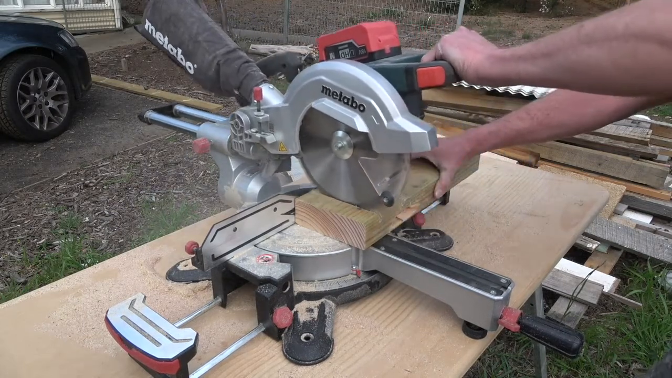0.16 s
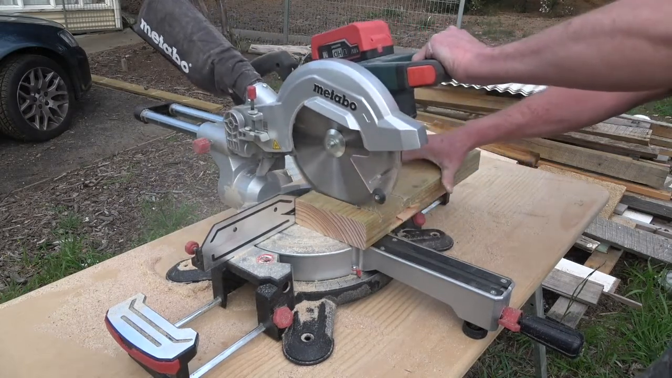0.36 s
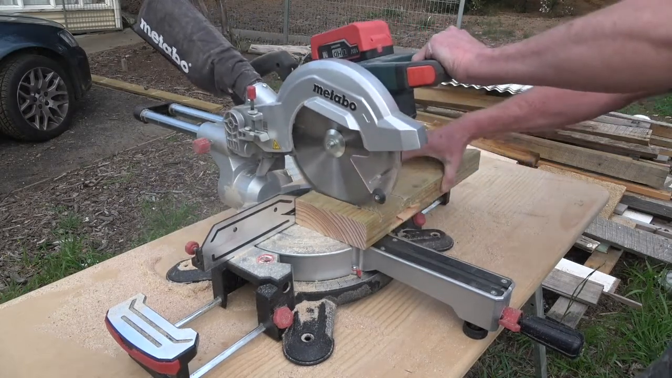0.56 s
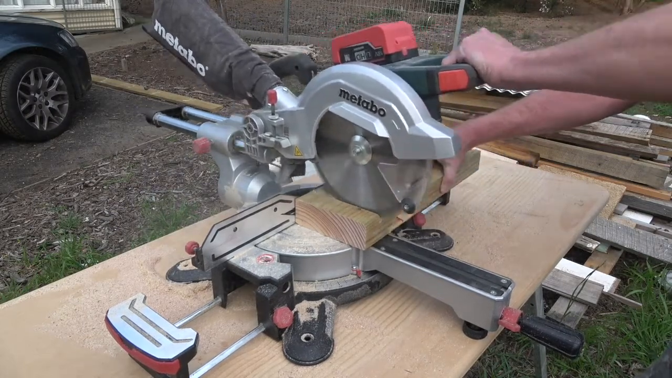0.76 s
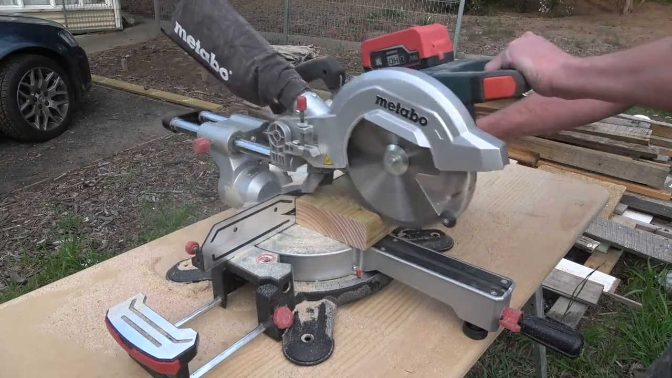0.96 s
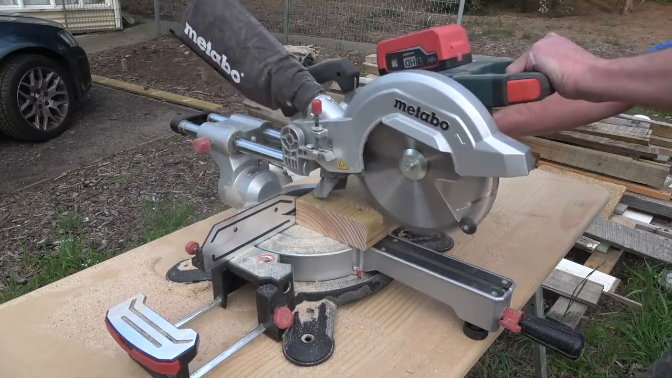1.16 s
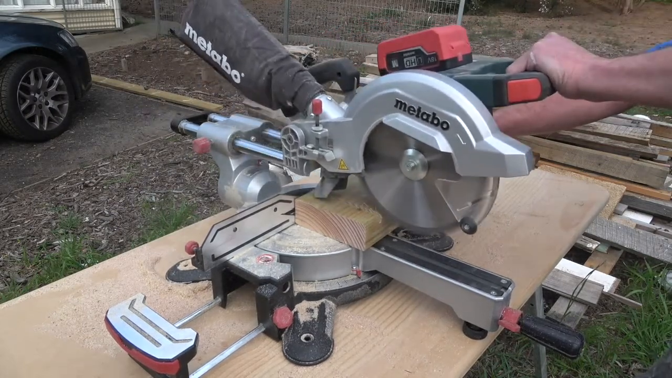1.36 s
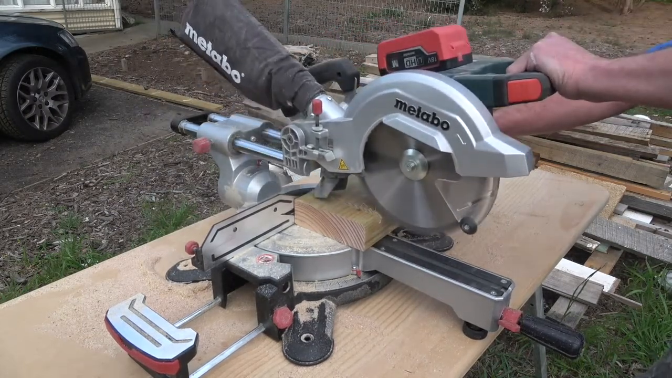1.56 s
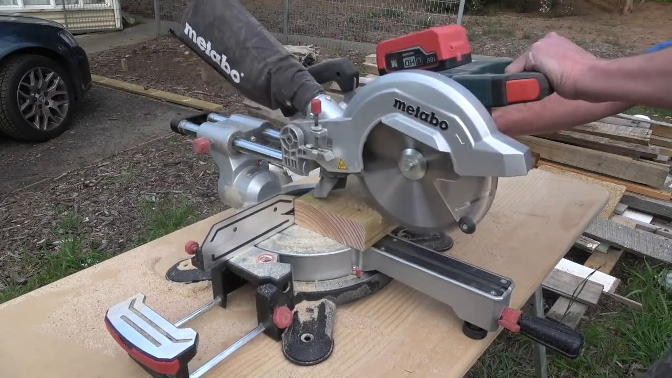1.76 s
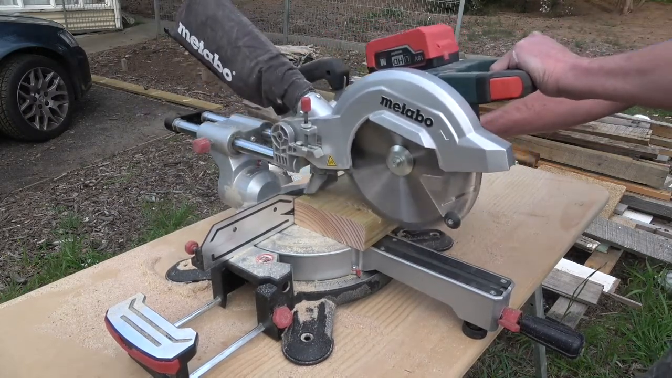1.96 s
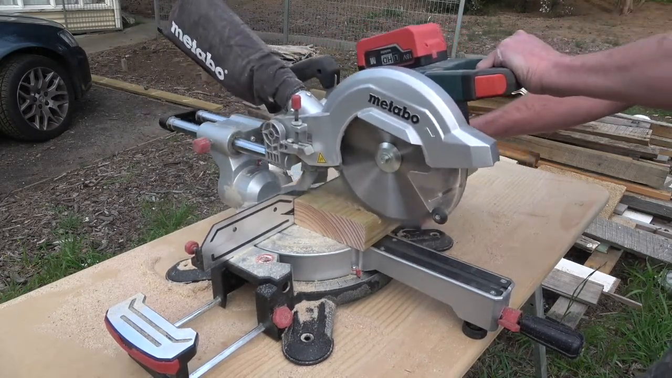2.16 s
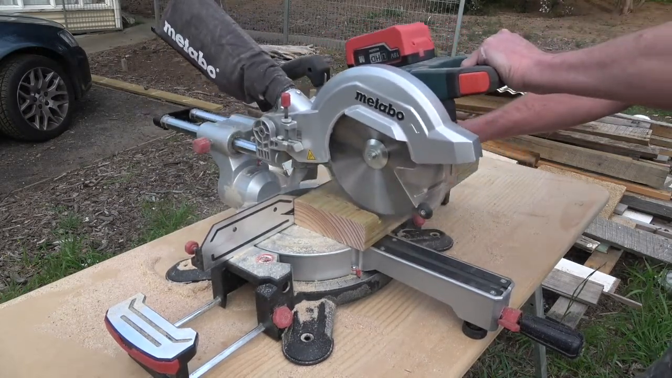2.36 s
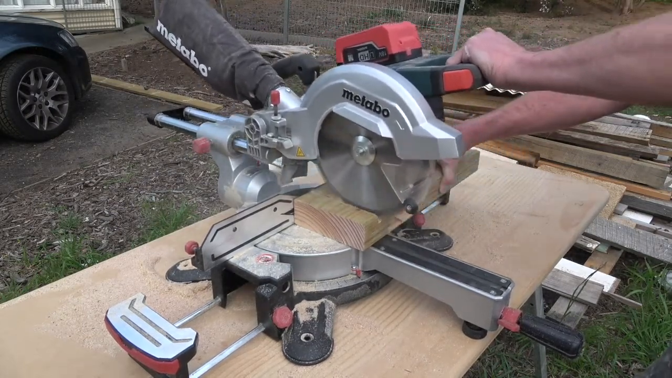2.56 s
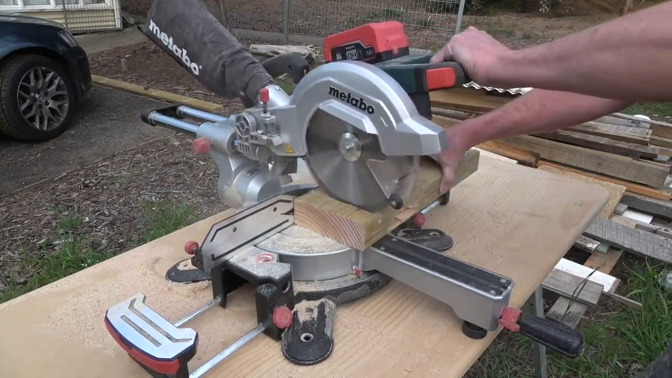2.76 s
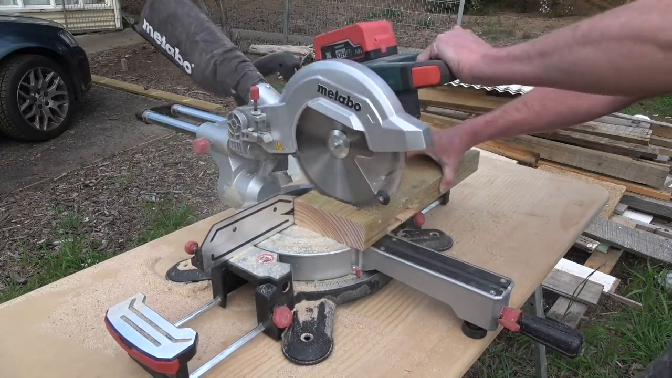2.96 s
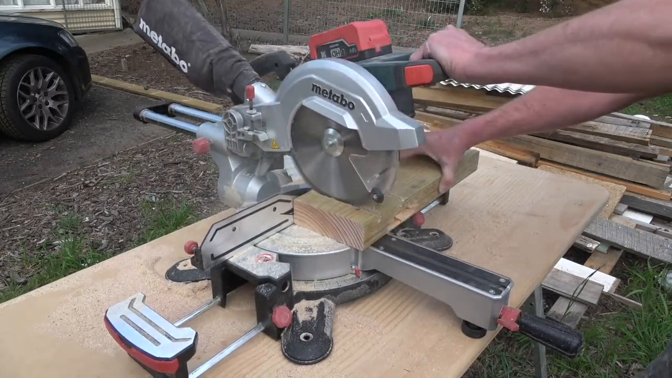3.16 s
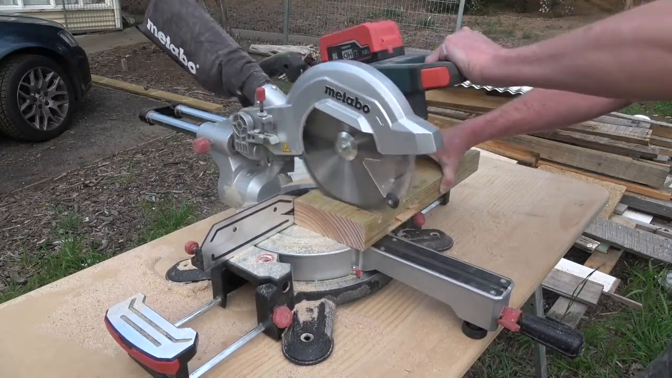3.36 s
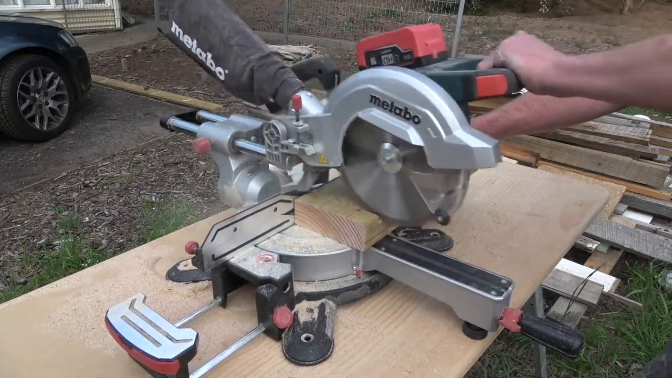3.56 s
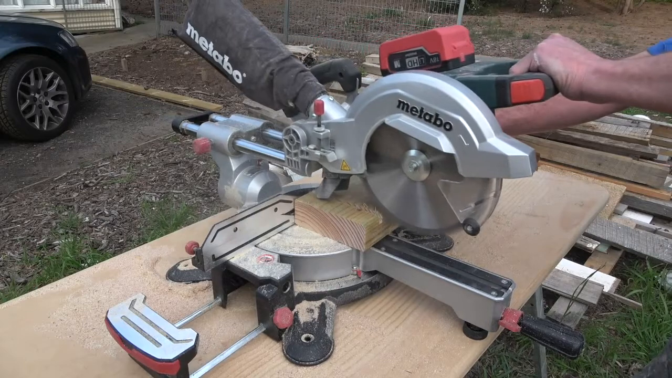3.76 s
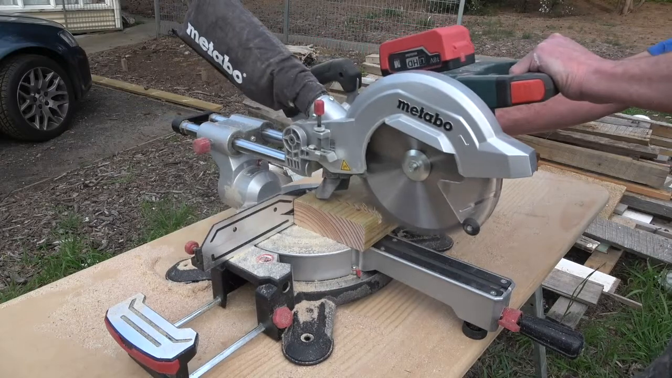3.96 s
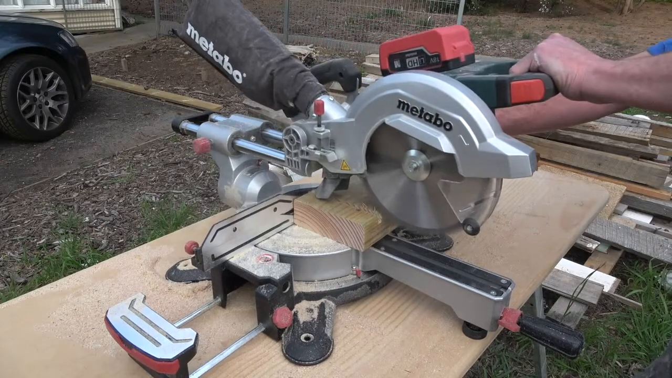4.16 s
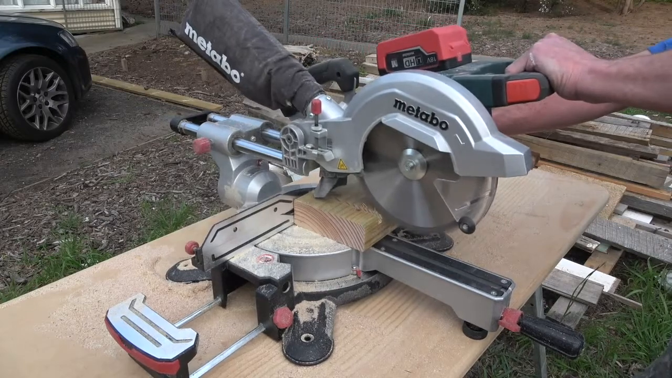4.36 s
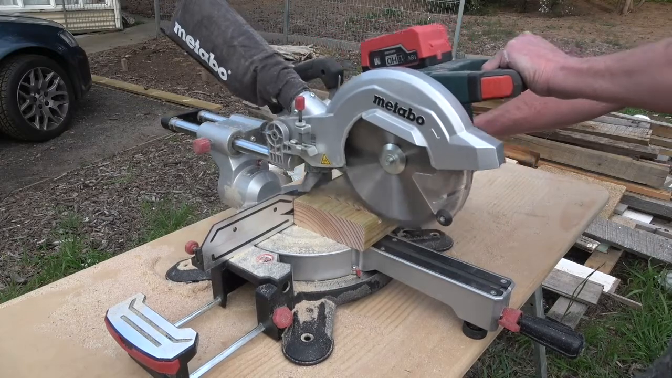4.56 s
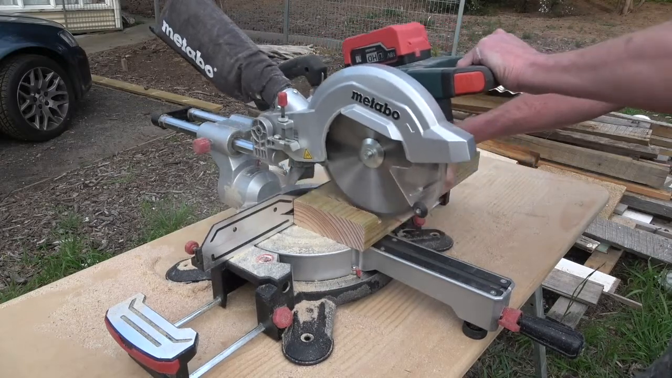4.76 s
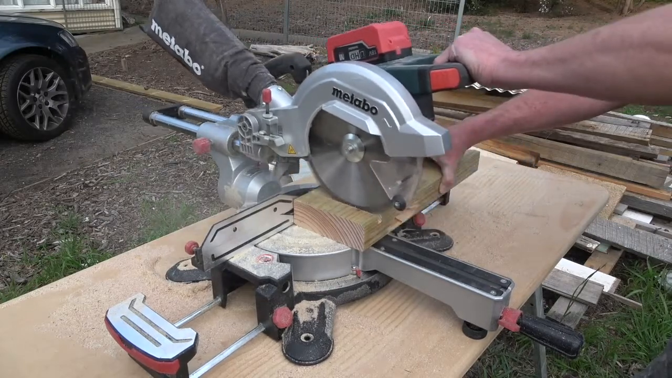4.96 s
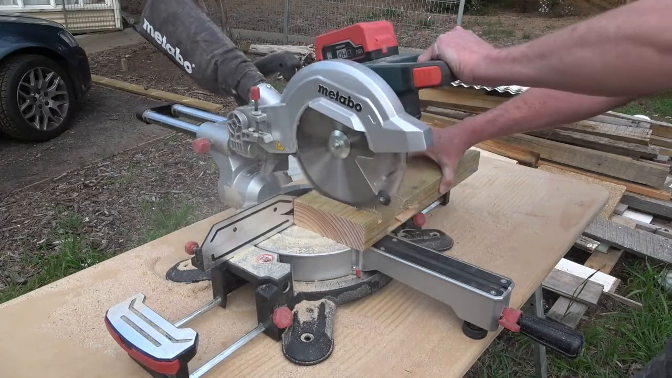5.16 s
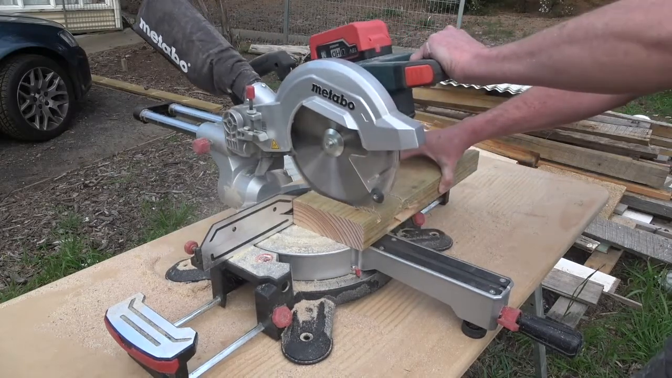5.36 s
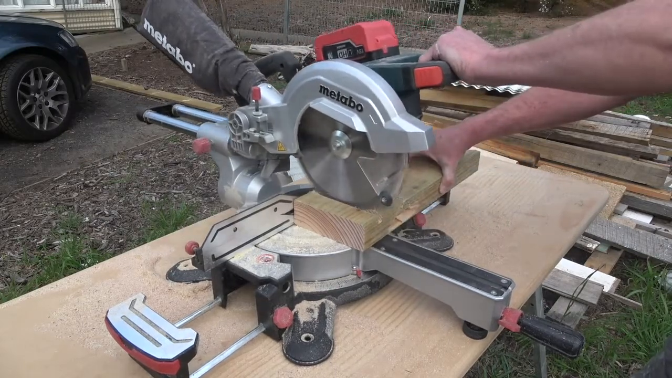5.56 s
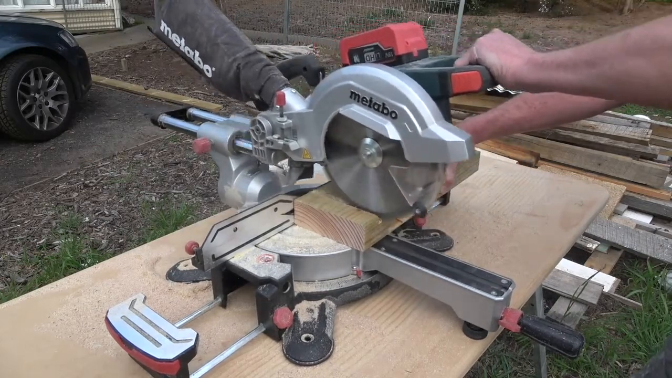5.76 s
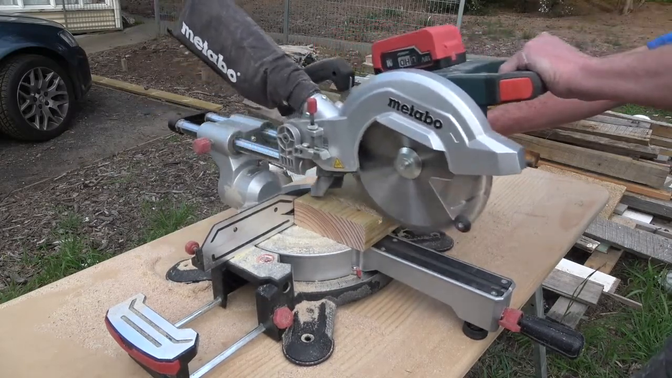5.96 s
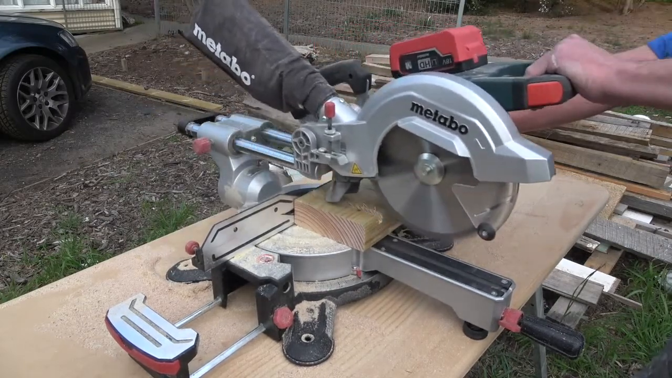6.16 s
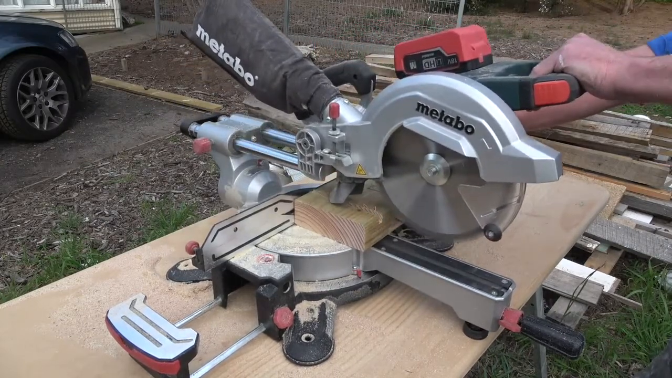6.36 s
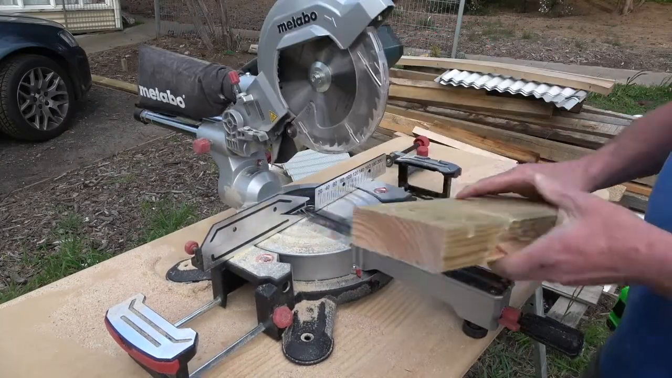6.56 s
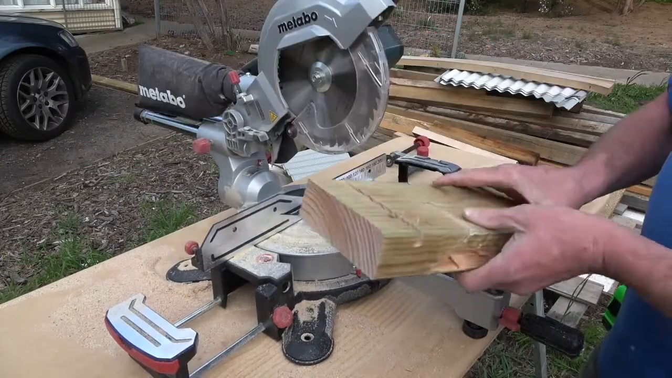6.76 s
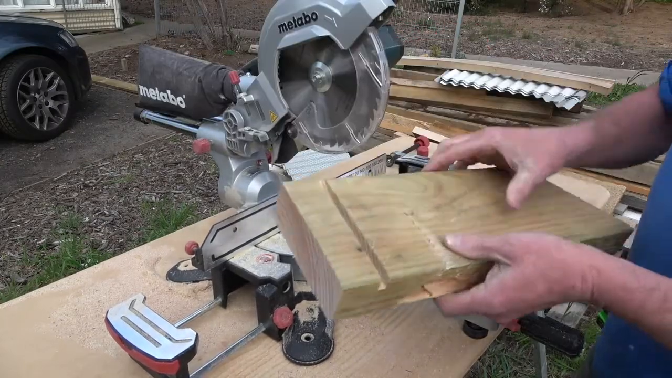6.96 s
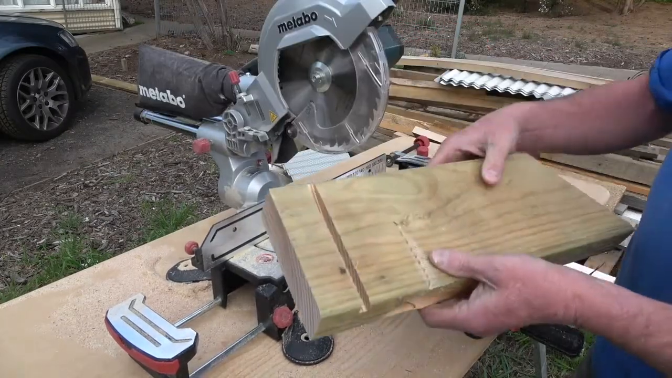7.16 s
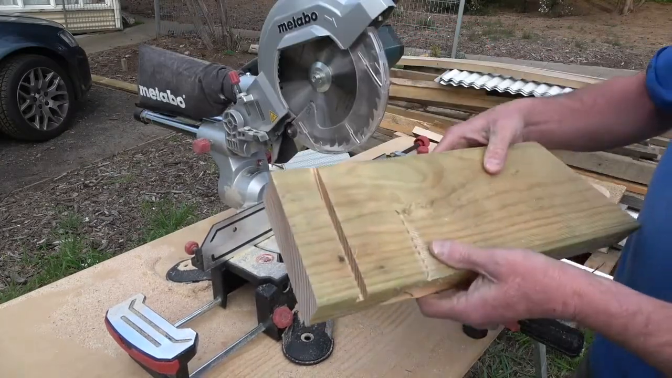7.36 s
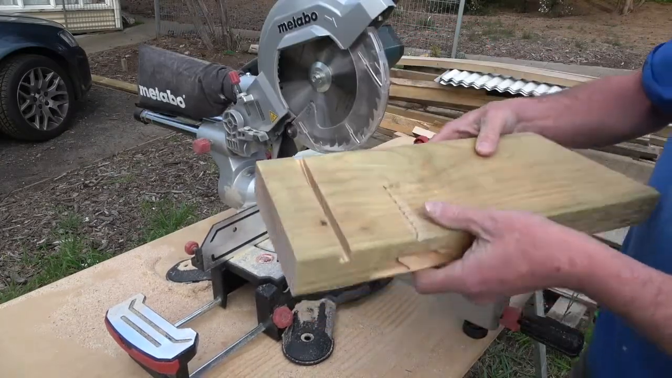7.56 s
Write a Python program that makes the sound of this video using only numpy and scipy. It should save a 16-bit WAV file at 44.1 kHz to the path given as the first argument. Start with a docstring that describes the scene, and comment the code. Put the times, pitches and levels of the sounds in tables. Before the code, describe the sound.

A power saw cuts wood three times, its pitch dipping and recovering, then slows and stops abruptly as wind bumps the microphone.

```python
"""Outdoors: a cordless mitre saw makes three passes through a plank, then brakes.
The motor sags under each cut and races free between them; the free blade roars in the air.
Teeth spray chips and make the steel blade ring; it squeals in the cuts.
The sound of the saw cuts off abruptly in mid run-down; then hands turn the plank over
against a steady, dull background. Wind bumps a mono microphone throughout."""
import sys
import numpy as np
from scipy import signal
from scipy.fft import rfft, irfft, next_fast_len
from scipy.io import wavfile
from scipy.ndimage import map_coordinates

SR = 44100
rng = np.random.default_rng(int(sys.argv[2]) if len(sys.argv) > 2 else 0)


def transcribe(signal):
    """Save signal, clipped to [-1, 1], as a 16-bit WAV file at the path in sys.argv[1]."""
    frames = np.atleast_2d(signal).T
    limited = np.clip(frames, -1, 1)
    pcm = np.round(limited * 32767).astype(np.int16)
    wavfile.write(sys.argv[1], SR, pcm)


N = 335595
TIME = np.arange(N) / SR

# wind gusts (time [s], half width [s], level [dB])
WIND_GUSTS = [(0.05, 0.19, -55.5), (0.75, 0.19, -47), (1.21, 0.2, -42), (2.804, 0.071, -47),
              (3.17, 0.088, -54), (3.98, 0.2, -46), (4.77, 0.23, -44), (5.4, 0.35, -56), (6.57, 0.064, -35),
              (6.9, 0.33, -43), (7.28, 0.071, -35.5), (7.517, 0.14, -34)]
# hands shifting grip (time [s], half width [s], level [dB])
HAND_GRIPS = [(6.61, 0.035, -67), (6.72, 0.04, -82), (6.836, 0.024, -64.5), (7.034, 0.043, -67.5),
              (7.177, 0.073, -76), (7.474, 0.03, -69.5)]
# air roar, louder as the head is drawn out (time [s], level [dB])
ROAR_LEVELS = [(0, -36.5), (1, -29), (1.8, -31.5), (3.05, -42), (3.45, -34.5), (4.3, -32.5), (5.15, -41),
               (5.95, -33), (6.5, -43)]
# passes through the plank (start [s], through [s], motor drag [Hz], attack [s],
# easing from [s], easing [Hz/s], contact level [dB])
PASSES = [(-0.9, 0.379, 49, 0.09, -0.27, 40.4, -24.2), (1.727, 3.045, 90.6, 0.516, 2.723, 70.6, -26),
          (4.355, 5.234, 42, 0.135, 4.69, 34, -27.7)]
# blade drawn back along the kerf (start [s], fade from [s], contact level [dB], fade [dB/s])
KERF_SCRAPES = [(0.348, 0.796, -26.5, 31.5), (3.025, 3.487, -28.5, 57), (5.2, 5.296, -30.5, 30),
                (5.64, 5.856, -31.5, 110)]
# blade snatching at the wood (time [s], contact level [dB], 20 dB decay [s])
SNATCHES = [(0.575, -24, 0.03), (1.778, -30, 0.1), (3.61, -33.5, 0.068), (3.641, -27.5, 0.099),
            (4.378, -29, 0.13), (5.512, -31.5, 0.088), (5.583, -29.5, 0.14), (5.884, -32, .1)]
# blade squeals in the cuts, then two steady rings as the saw brakes
# (time [s], half width [s], frequency [Hz], relative level [dB])
BLADE_TONES = [(0.057, 0.16, 7135, -36), (0.197, .09, 5240, -40.5), (0.2, .2, 2935, -44),
               (2.2, 0.17, 3731, -46), (2.25, .2, 3077, -44), (2.9, .14, 5040, -43), (2.91, .13, 5240, -41),
               (2.92, .13, 4368, -43), (2.917, 0.078, 7098, -40), (2.946, 0.057, 6332, -41),
               (3.0, .14, 5294, -43), (5.004, 0.07, 3731, -41), (5.0, .08, 6270, -50),
               (5.19, .08, 3731, -39), (6.25, .22, 4057, -50), (6.3, .16, 5430, -48)]
# shaft hum, rotor whine, tooth note, its octave, whistle (shaft order, base level [dB],
# load gain [dB], resonance [Hz], half width [Hz], lift [dB], load roughness, flicker [dB])
DRIVE_TONES = [(1, -62, 3, 346, 13, 16, 0.07, 1.1), (7, -48, 3, 2430, 180, 13.5, 0.1, 2.2),
               (8, -53, 9.5, 2580, 470, 20, 0.13, 1.5), (16, -46.5, 5.5, 5500, 200, 15, 0.18, 2.8),
               (25, -48, 4, 9122, 62, 13.5, 0.35, 1.3)]
# braking whines (shaft order, relative level [dB])
BRAKE_WHINES = [(3, -5), (16, -3), (17, -6), (20, -6), (24, -5), (25, 0), (36, -5), (37, -3), (41, -5),
                (42, 2), (43, -7), (49, -6)]

# spectra (frequency [Hz], relative density [dB])
OUTDOOR_SPECTRUM = [(71, -25), (120, -6), (164, -24), (332, -17), (465, -15.5), (591, -20), (1540, -19.5),
                    (2530, -31), (3500, -28), (4550, -61), (7700, -120)]  # steady, dull background
BUFFET_SPECTRUM = [(10, -13), (22, 10), (36, 0.5), (48, -5.5), (62, -9), (80, -14.5), (110, -35),
                   (200, -38), (500, -70)]  # wind
RUSTLE_SPECTRUM = [(1290, -26), (2200, 0), (2650, -13), (3060, 0), (3560, -12), (3830, 5), (4610, -6),
                   (6200, -6.5), (7520, -18), (12400, -16), (15000, -19)]  # hands shifting
ROAR_SPECTRUM = [(60, -35), (150, -24), (230, -18), (350, -17), (520, -4), (640, -5), (780, -1.5),
                 (930, 0.5), (1090, 5), (1250, -2.5), (1420, -18), (2200, -5.5), (5000, -50.5)]  # air in the guard
RUSH_SPECTRUM = [(300, -38.5), (1000, -17), (1450, -4.5), (2000, 1.5), (2400, -0.5), (2620, -1.5),
                 (3050, 1), (3800, 3), (5550, 3), (6300, -8), (7200, -15), (11400, -20.5), (12400, -12),
                 (13600, -29)]  # air at the teeth
SCREECH_SPECTRUM = [(300, -24.5), (1000, -3.5), (1500, -13.5), (2600, -10), (4300, -18), (5400, 4.5),
                    (6500, -3.5), (8000, 1), (10000, -10.5), (12600, 0.5), (15500, -12)]  # gear buzz in a cut
CHIP_SPECTRUM = [(150, -33.5), (400, -6.5), (1000, -6.5), (1500, -1), (2600, 1.5), (3300, 6.5), (4400, 7),
                 (5400, 6), (6500, 0), (8200, 2), (11200, -4.5), (12900, 3), (13700, -2), (15700, -6.5)]  # tearing wood

# resonances (frequency [Hz], width [Hz], relative level [dB])
PLANK_MODES = [(477, 19, 5), (620, 18, 2), (770, 25, 4), (1910, 85, -34), (2970, 100, -25)]
HOUSING_MODES = [(1045, 170, -5.5), (2650, 180, 7.5), (3410, 200, -2), (4100, 91, -11), (5460, 110, 5),
                 (6200, 303, -15), (7300, 160, -4), (7780, 260, -7), (12020, 380, -1), (12540, 360, 1.5)]
BLADE_MODES = [(2552, 42, -1.5), (3716, 12, 1.5), (5030, 40, -1), (5150, 24, 1.5), (5360, 72, -2.5),
               (5890, 31, -2.5), (6270, 30, -8), (6740, 55, -8.5), (7200, 20, -4), (8100, 110, -7),
               (9130, 70, -8), (9480, 73, -9), (10400, 59, -8), (11820, 80, -10), (12200, 83, -17)]

FREE_HZ, INERTIA_S = 364.5, 0.217  # motor shaft
GEAR_RATIO, TOOTH_ORDER = 5, 8  # shaft turns per blade turn, teeth per shaft turn
BRAKE_S, BRAKE_ATTACK_S, BRAKE_HZ_PER_S = 5.997, 0.027, 356
CUTOFF_S = 6.506  # saw sound ends abruptly


def amp(db):
    """Decibels to gain."""
    return 10 ** (np.asarray(db) / 20)


def unit(x):
    """Scale to rms 1."""
    return x / np.sqrt(np.mean(x ** 2) + 1e-20)


def noise():
    """White noise."""
    return rng.standard_normal(N)


def wobble(rate_hz):
    """Smooth random curve with knots at rate_hz."""
    knots = rng.standard_normal(int(N * rate_hz / SR) + 4)
    return map_coordinates(knots, [TIME * rate_hz], mode="nearest")


def swell(time_s, half_s):
    """Bell-shaped rise and fall."""
    return np.exp(-((TIME - time_s) / half_s) ** 2)


def stroke(start_s, end_s, attack_s, fade_db_per_s):
    """Attack, hold until end_s, steady fade."""
    attack = np.clip((TIME - start_s) / attack_s, 0, 1)
    return attack * amp(-fade_db_per_s * np.maximum(TIME - end_s, 0))


def filtered(x, response):
    """Apply a frequency response."""
    size = next_fast_len(N + SR // 4)
    return irfft(rfft(x, size) * response(np.fft.rfftfreq(size, 1 / SR)), size)[:N]


def coloured(x, spectrum):
    """Shape by a spectrum; rms 1."""
    points_hz, db = np.transpose(spectrum)
    return unit(filtered(x, lambda hz: amp(np.interp(np.log(hz + 1), np.log(points_hz), db))))


def ringing(x, modes):
    """Excite damped modes; rms 1."""
    t = np.arange(SR // 8) / SR
    ring = sum(amp(db) * width_hz * np.exp(-np.pi * width_hz * t) * np.cos(2 * np.pi * hz * t)
               for hz, width_hz, db in modes)
    return unit(signal.fftconvolve(x, ring)[:N])


def per_turn(turns, orders, gains, size=4096):
    """Wave repeating each turn; random phase per order."""
    lines = np.zeros(size // 2 + 1, complex)
    lines[orders] = gains * np.exp(2j * np.pi * rng.random(len(orders)))
    return np.interp(turns % 1 * size, np.arange(size), unit(irfft(lines)))


def background():
    """Steady, dull outdoor noise."""
    return amp(-64 + 1.5 * wobble(12)) * coloured(noise(), OUTDOOR_SPECTRUM)


def wind(breeze_db=-68):
    """Slow lumps of air on the microphone."""
    gusts = sum(amp(db) * swell(time_s, half_s) for time_s, half_s, db in WIND_GUSTS)
    return (amp(breeze_db) + gusts) * amp(1.5 * wobble(10)) * coloured(noise(), BUFFET_SPECTRUM)


def hands():
    """Faint dry rustle, swelling at each change of grip."""
    grips = amp(-76.5) + sum(amp(db) * swell(time_s, half_s) for time_s, half_s, db in HAND_GRIPS)
    return grips * coloured(noise() * amp(2.1 * wobble(400)), RUSTLE_SPECTRUM)


def palm_slide(time_s=7.03, attack_s=0.05, from_hz=1400, to_hz=500, glide_s=0.06):
    """A palm slides along the wood; the hollow under it deepens."""
    hz = to_hz + (from_hz - to_hz) * np.exp(-np.maximum(TIME - time_s, 0) / glide_s)
    hollow = np.real((wobble(750) + 1j * wobble(750)) * np.exp(2j * np.pi * np.cumsum(hz) / SR))
    return amp(-57.5) * stroke(time_s - attack_s, time_s, attack_s, fade_db_per_s=40) * hollow


def plank_bump(time_s=6.529, attack_s=0.02):
    """The plank bumps the table once and rings."""
    envelope = stroke(time_s - attack_s, time_s, attack_s, fade_db_per_s=420)
    return amp(-44) * envelope * ringing(noise(), PLANK_MODES)


def windage(load, buzz, crowd):
    """Blade and fan churn the air, gears sing through it; the rush thins under load and braking."""
    roar_db = np.interp(TIME, *np.transpose(ROAR_LEVELS))
    roar = amp(roar_db + 0.54 * wobble(30)) * coloured(noise(), ROAR_SPECTRUM)
    slowing = np.clip((TIME - BRAKE_S) / 0.26, 0, 1)
    rush_db = 6 - 1.7 * load - 3 * slowing + 0.45 * wobble(40)  # re roar
    rush = amp(rush_db) * coloured(noise() + 0.077 * buzz, RUSH_SPECTRUM)
    plate = amp(-7.5) * ringing(noise(), BLADE_MODES[:1])  # airflow excites the lowest mode
    return roar + amp(roar_db) * (rush + plate + amp(-5.5) * crowd)


def guard(x, decay_s=0.0033):
    """Crowded modes of the metal guard make a gliding tone flare and fade."""
    t = np.arange(SR // 50) / SR
    ring = rng.standard_normal(len(t)) * np.exp(-t / decay_s)
    return unit(signal.fftconvolve(x, ring)[:N])


def drag(t, start_s, through_s, drag_hz, attack_s, ease_s, ease_hz_per_s):
    """Motor drag [Hz] of one cut: builds, eases with the hand, ends at breakthrough."""
    push_hz = drag_hz - ease_hz_per_s * np.maximum(t - ease_s, 0)
    sinking = 1 - np.exp(-np.maximum(t - start_s, 0) / attack_s)
    in_wood = np.clip((through_s - t) / 0.05 + 0.5, 0, 1)
    return push_hz * sinking * in_wood


def motor_speed():
    """Shaft speed [Hz]: lags the load through inertia, falls steadily under the brake."""
    t = np.arange(-SR, N) / SR  # first cut starts before time zero
    drag_hz = sum(drag(t, *cut) for *cut, _ in PASSES)
    step = 1 / (INERTIA_S * SR)
    sag_hz = signal.lfilter([step], [1, step - 1], drag_hz)[SR:]
    return FREE_HZ - sag_hz - BRAKE_HZ_PER_S * np.maximum(TIME - BRAKE_S, 0)


def gears(turns):
    """Buzz of shaft overtones; crowd of blade orders around rotor whine and tooth note."""
    orders = np.arange(2, 48)
    gains = amp(2.5 * rng.standard_normal(len(orders))) / (1 + (orders / 42) ** 6)
    buzz = per_turn(turns + 0.0035 * wobble(140), orders, gains)
    crowd = per_turn(turns / GEAR_RATIO, [30, 36, 37, 38, 39, 45], [0.5, 0.5, 1, 0.4, 0.6, 0.45])
    return buzz, crowd * (1 + 0.5 * wobble(40))


def brake(turns, buzz):
    """Braking windings buzz: falling whines flare as they cross the housing modes."""
    orders, db = np.transpose(BRAKE_WHINES)
    whines = per_turn(turns + 0.0027 * wobble(200), np.rint(orders).astype(int), amp(db))
    whines *= 1 + 0.3 * wobble(130)
    whines = unit(whines + 0.7 * guard(whines))
    housing = ringing(whines + 0.6 * buzz + 0.9 * noise(), HOUSING_MODES)
    overtones = amp(-5) * coloured(guard(buzz) + guard(whines), RUSH_SPECTRUM)
    envelope = stroke(BRAKE_S - BRAKE_ATTACK_S, BRAKE_S, BRAKE_ATTACK_S, fade_db_per_s=11)
    return amp(-33.5) * envelope * (housing + overtones)


def drive(speed_hz, turns, load, fade_db_per_s=0.4):
    """Tones swell with load and near resonance; run-out shakes the tooth notes each blade turn."""
    runout = np.cos(2 * np.pi * turns / GEAR_RATIO)
    brake_load = 0.85 * stroke(BRAKE_S, BRAKE_S + 0.3, BRAKE_ATTACK_S, fade_db_per_s=25)
    out = np.zeros(N)
    for order, db, load_db, hz, half_hz, lift_db, roughness, flicker_db in DRIVE_TONES:
        is_tooth_note = order % TOOTH_ORDER == 0
        torque = np.maximum(load ** 1.2, brake_load * is_tooth_note)
        resonance_db = lift_db / (1 + ((order * speed_hz - hz) / half_hz) ** 4)
        level_db = db + load_db * torque + resonance_db + flicker_db * wobble(32)
        shake = 1 + is_tooth_note * (0.12 + 0.26 * load) * runout
        rough = (0.08 + roughness * np.maximum(load, brake_load)) * (wobble(170) + 1j * wobble(170))
        out += amp(level_db) * shake * np.real((1 + rough) * np.exp(2j * np.pi * order * turns))
    return out * amp(-fade_db_per_s * TIME)


def blade_tones():
    """Single blade modes swell and waver: squeals in the cuts, two steady rings as the saw brakes."""
    out = np.zeros(N)
    for time_s, half_s, hz, db in BLADE_TONES:
        envelope = amp(db + 7.5) * swell(time_s, half_s) * (1 + 0.19 * wobble(70))
        out += envelope * np.sin(2 * np.pi * hz * TIME + 0.45 * wobble(45))
    return out


def tooth_contact(free_rattle_db=-43, half_buried_hz=8.7, scrape_attack_s=0.037):
    """How hard the teeth work: running free, cutting, or scraping on the way back."""
    power = (amp(free_rattle_db) * (TIME < BRAKE_S)) ** 2
    for *cut, db in PASSES:
        depth = (drag(TIME, *cut) / half_buried_hz) ** 2
        power += (amp(db) * depth / (1 + depth)) ** 2
    for start_s, end_s, db, fade_db_per_s in KERF_SCRAPES:
        power += (amp(db) * stroke(start_s, end_s, scrape_attack_s, fade_db_per_s)) ** 2
    return np.sqrt(power)


def uneven_teeth(turns):
    """No two teeth cut alike: blade orders above the tooth note, flaring in the guard."""
    orders = np.arange(62, 125)
    comb = per_turn(turns / GEAR_RATIO, orders, amp(3 * rng.standard_normal(len(orders))))
    return coloured(guard(comb), CHIP_SPECTRUM)


def cutting(speed_hz, turns, contact, buzz, crowd):
    """Each tooth tears out a burst of chips; teeth and drive ring the blade."""
    bite = contact * amp(1.3 * wobble(18) + 0.7 * wobble(90))
    for time_s, db, decay_s in SNATCHES:
        bite += amp(db) * stroke(time_s, time_s, attack_s=0.002, fade_db_per_s=20 / decay_s)
    blade_turns = turns / GEAR_RATIO
    tooth = np.cos(2 * np.pi * TOOTH_ORDER * turns)
    orders = np.arange(1, 13)
    uneven = per_turn(blade_turns, orders, 1 / np.sqrt(orders))
    tearing = noise() * amp(5.5 * tooth + 1.5 * uneven + 1.8 * wobble(1500))
    chips = amp(-5 + 1.4 * wobble(60)) * coloured(tearing, CHIP_SPECTRUM)
    steel = amp(-6.2 + wobble(12)) * ringing(unit(tearing) + 0.55 * buzz, BLADE_MODES)
    screech = amp(-8.5) * coloured(guard(buzz), SCREECH_SPECTRUM)
    groan = per_turn(blade_turns, [4, 15], [0.25, 1]) * (1 + 0.4 * wobble(20))
    sag = 1 - speed_hz / FREE_HZ
    strain = sag * (amp(-13) * groan + amp(-9) * crowd)  # labouring motor
    return bite * (chips + steel + screech + strain + amp(-11) * uneven_teeth(turns))


def scene():
    """Saw, then hands over the background; wind throughout. Both channels alike."""
    speed_hz, contact = motor_speed(), tooth_contact()
    turns = np.cumsum(speed_hz * (1 + 0.0004 * wobble(45))) / SR  # shaft angle with flutter
    load = np.clip(contact * amp(23.5), 0, 1)
    buzz, crowd = gears(turns)
    saw = (drive(speed_hz, turns, load) + cutting(speed_hz, turns, contact, buzz, crowd)
           + blade_tones() + windage(load, buzz, crowd) + brake(turns, buzz))
    after_saw = background() + hands() + palm_slide() + plank_bump()
    mono = np.where(TIME < CUTOFF_S, saw, after_saw) + wind()
    return np.array([mono, mono])


def record(dry, top_hz=15750):
    """Steep low-pass."""
    return np.array([filtered(x, lambda hz: np.clip((top_hz - hz) / 100 + 0.5, 0, 1)) for x in dry])


dry = scene()
out = record(dry)
transcribe(out)
```